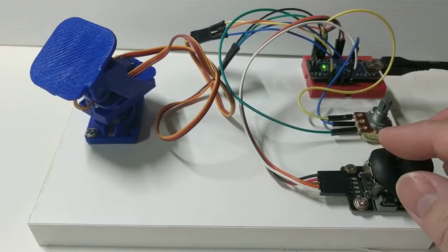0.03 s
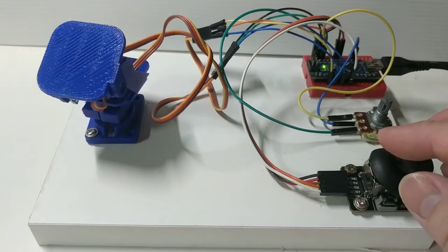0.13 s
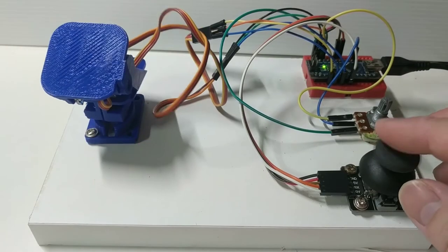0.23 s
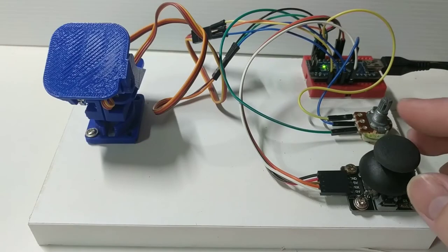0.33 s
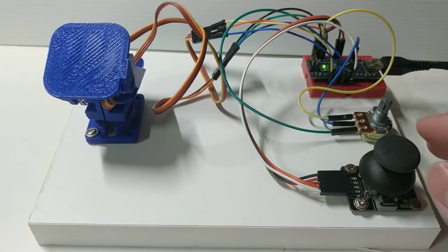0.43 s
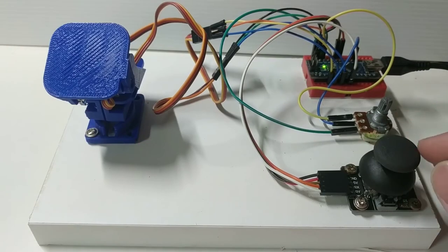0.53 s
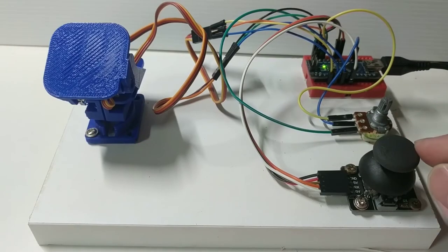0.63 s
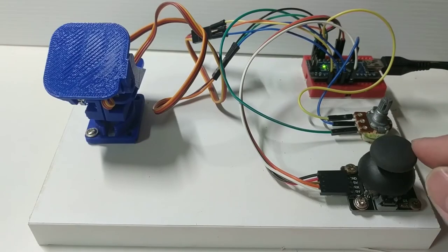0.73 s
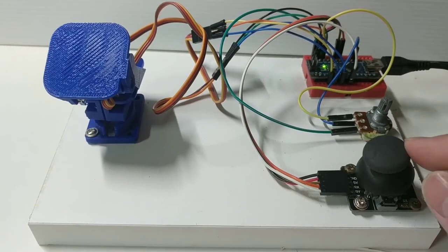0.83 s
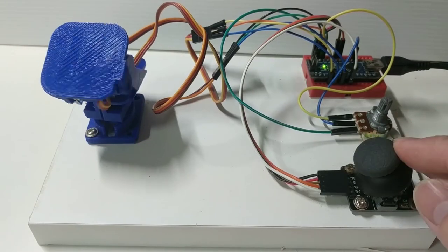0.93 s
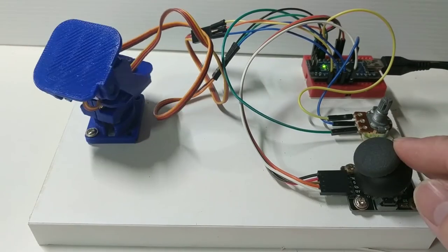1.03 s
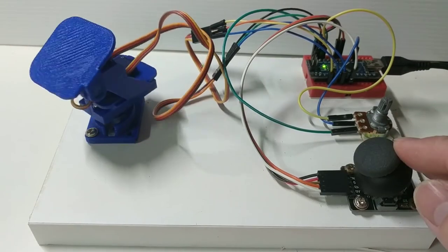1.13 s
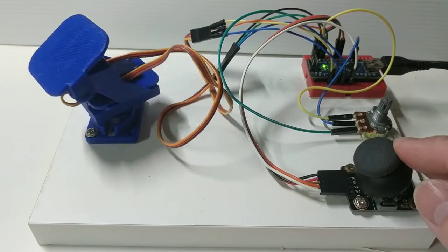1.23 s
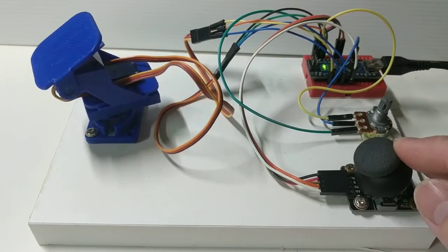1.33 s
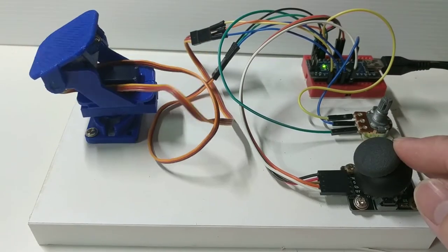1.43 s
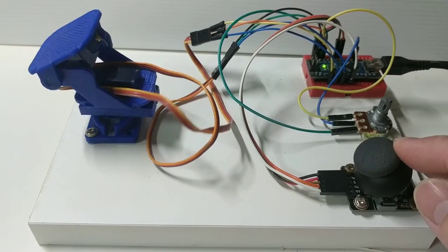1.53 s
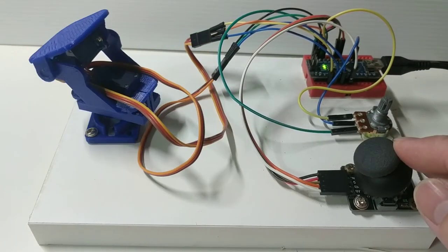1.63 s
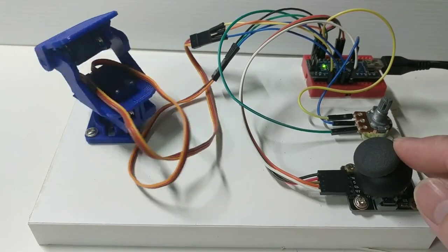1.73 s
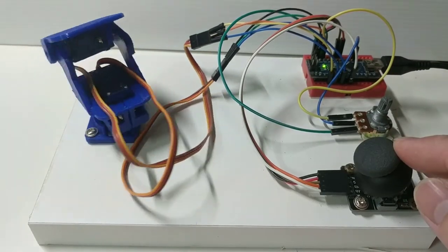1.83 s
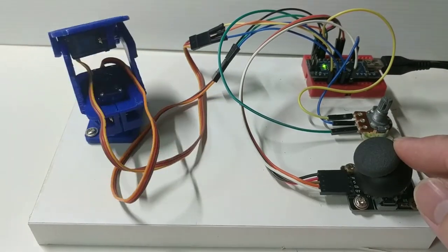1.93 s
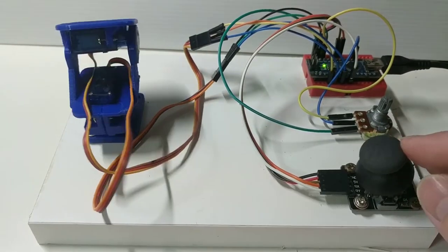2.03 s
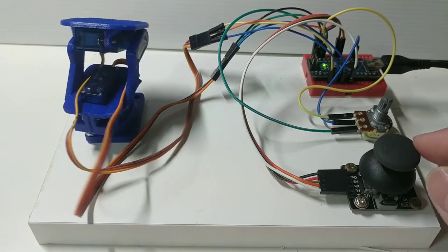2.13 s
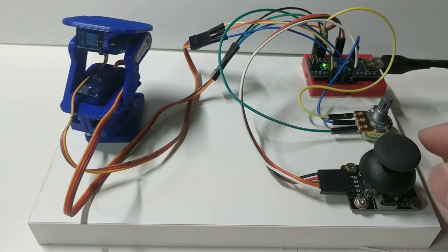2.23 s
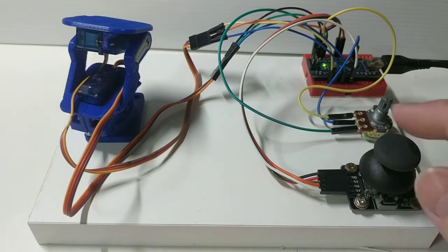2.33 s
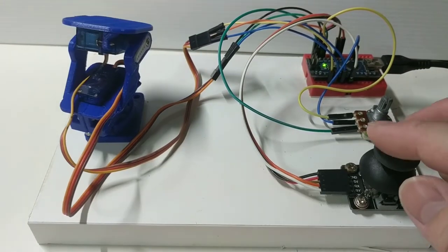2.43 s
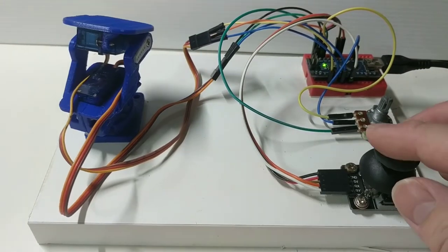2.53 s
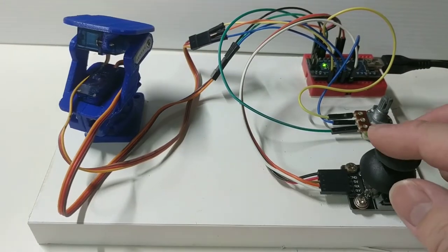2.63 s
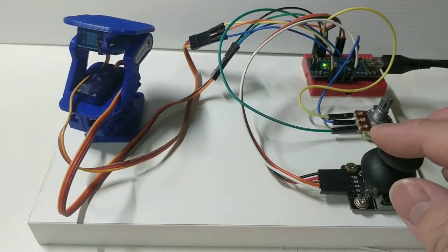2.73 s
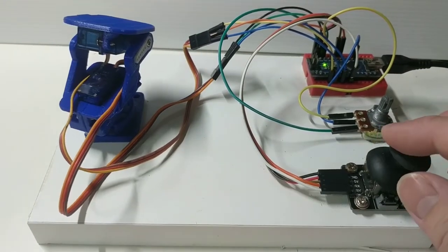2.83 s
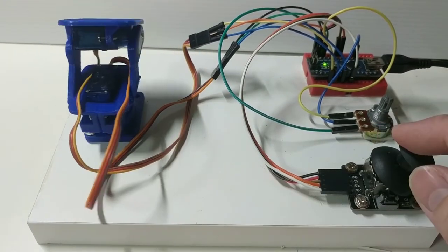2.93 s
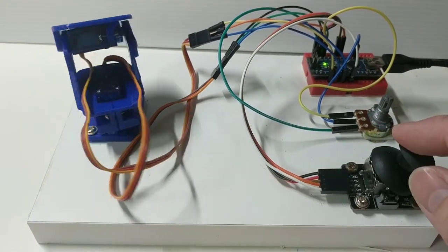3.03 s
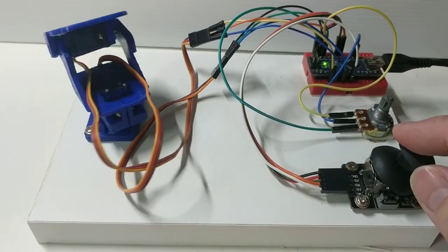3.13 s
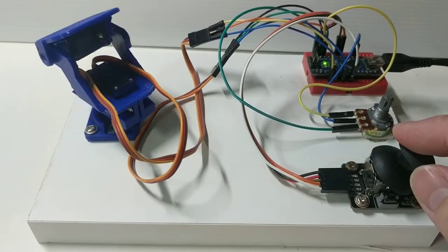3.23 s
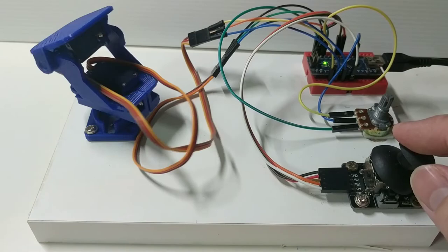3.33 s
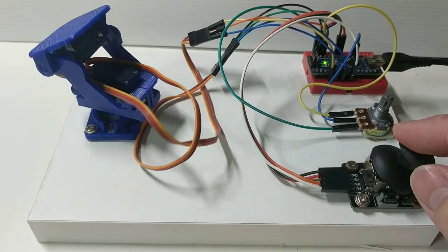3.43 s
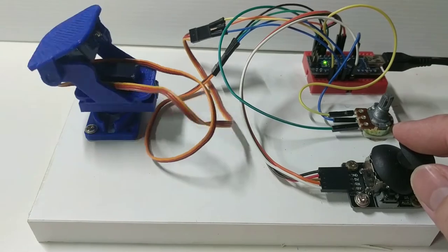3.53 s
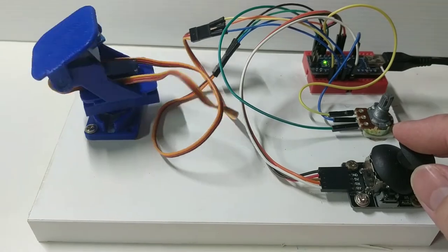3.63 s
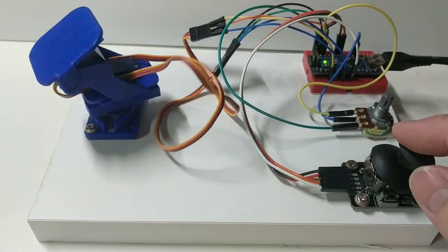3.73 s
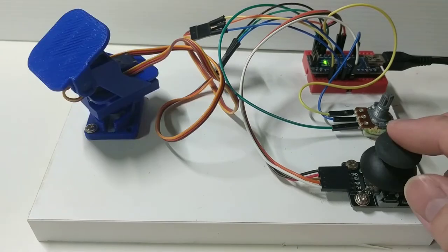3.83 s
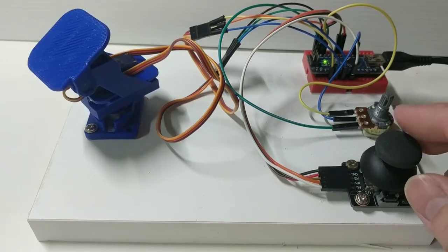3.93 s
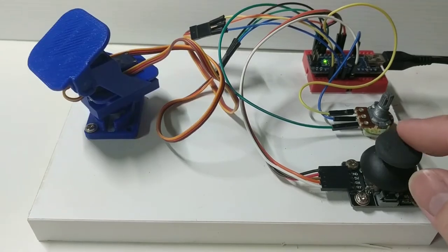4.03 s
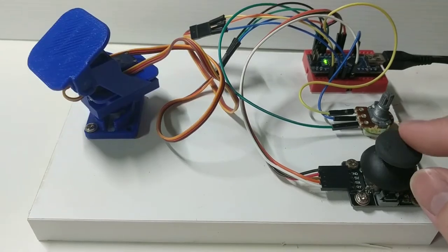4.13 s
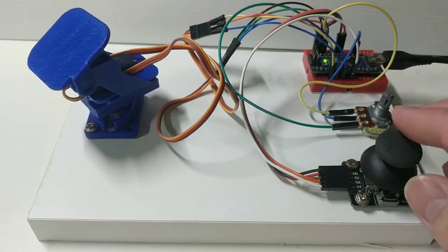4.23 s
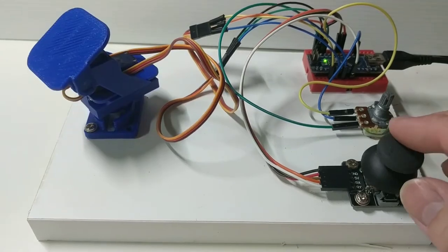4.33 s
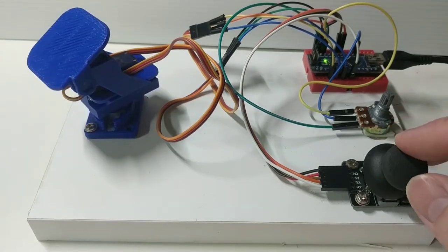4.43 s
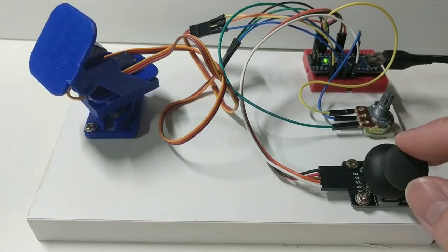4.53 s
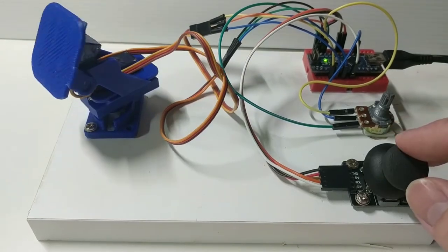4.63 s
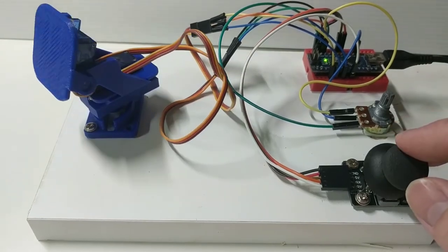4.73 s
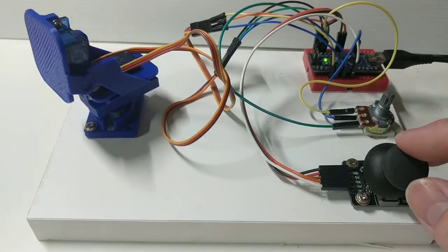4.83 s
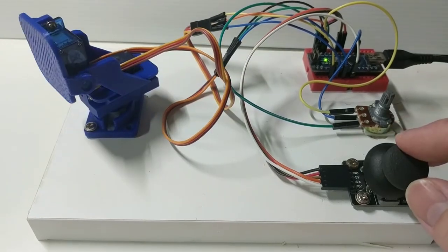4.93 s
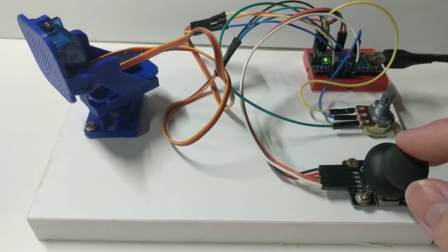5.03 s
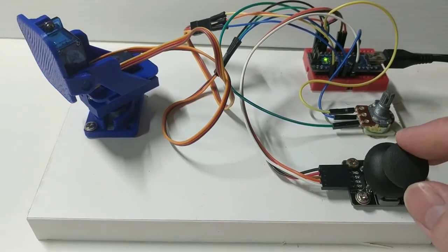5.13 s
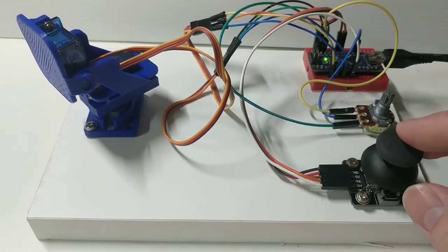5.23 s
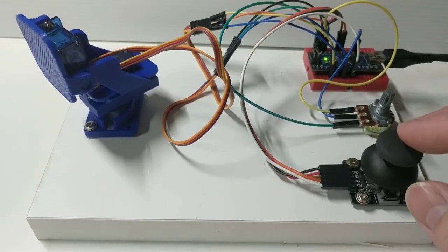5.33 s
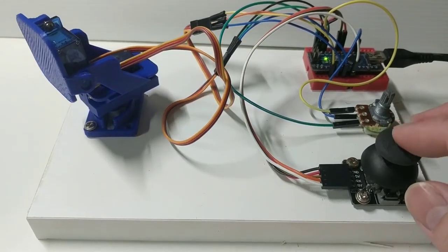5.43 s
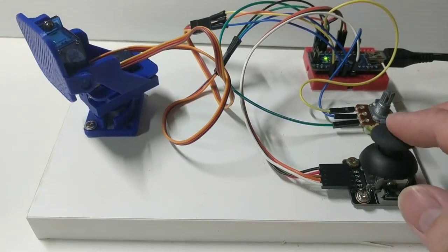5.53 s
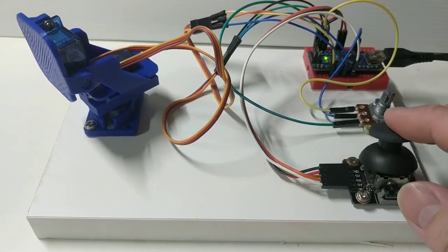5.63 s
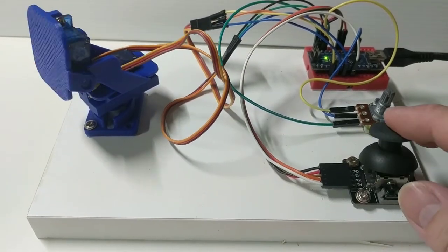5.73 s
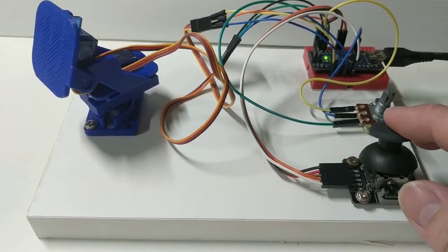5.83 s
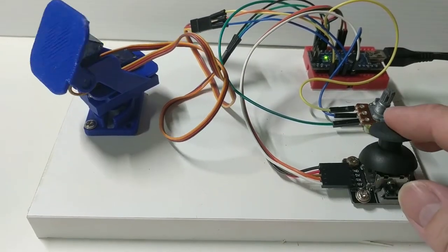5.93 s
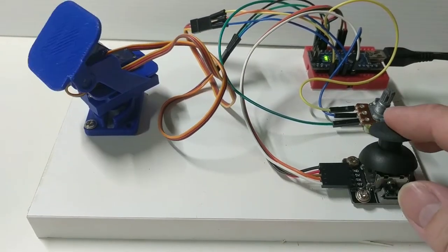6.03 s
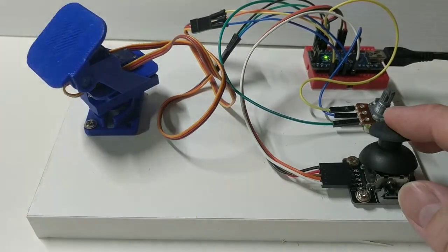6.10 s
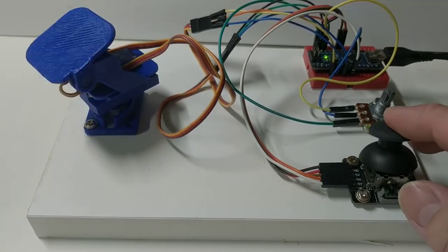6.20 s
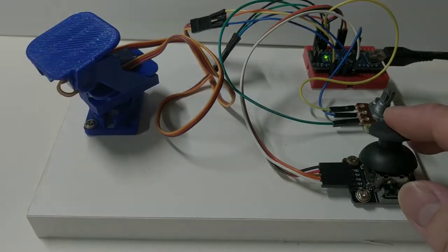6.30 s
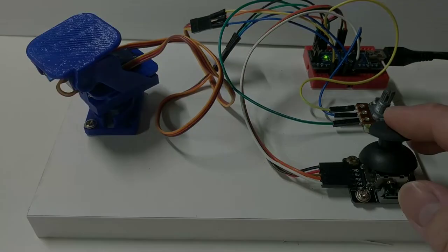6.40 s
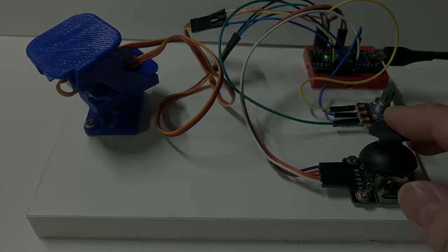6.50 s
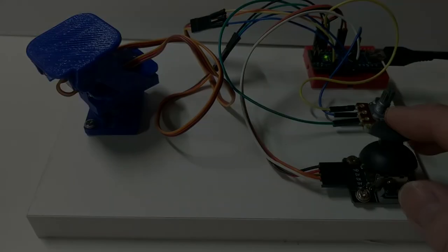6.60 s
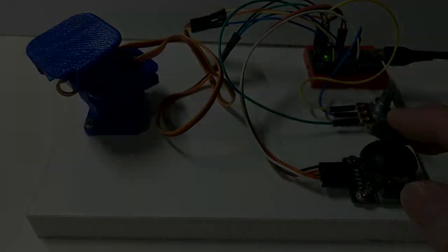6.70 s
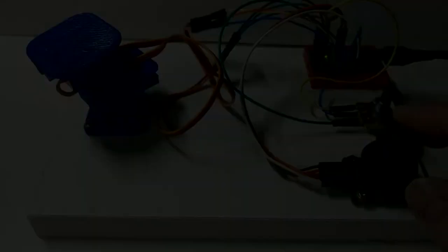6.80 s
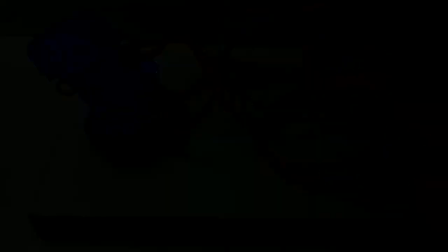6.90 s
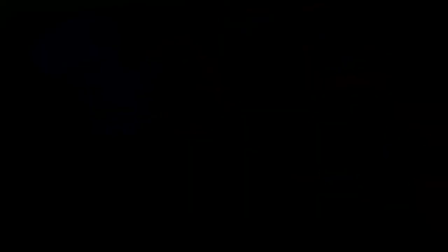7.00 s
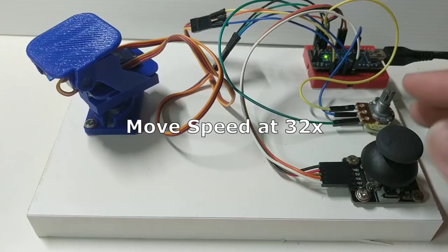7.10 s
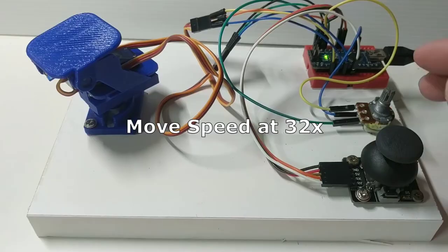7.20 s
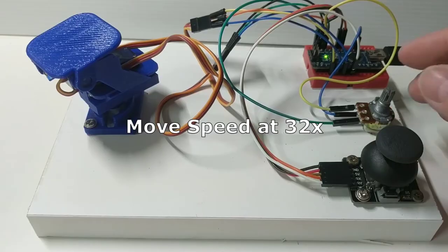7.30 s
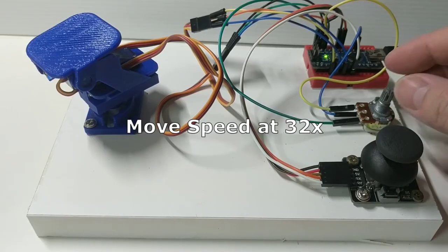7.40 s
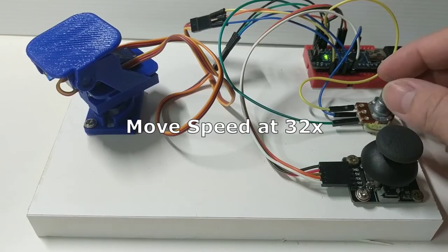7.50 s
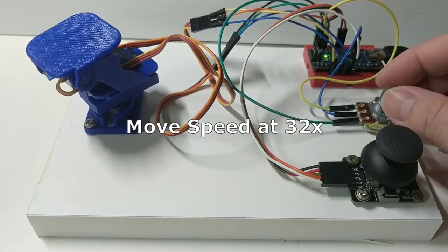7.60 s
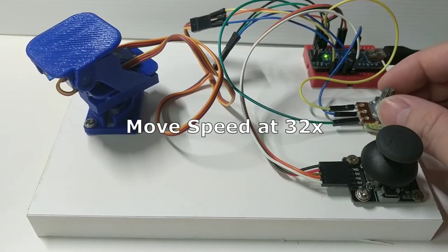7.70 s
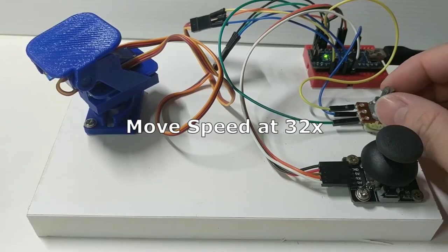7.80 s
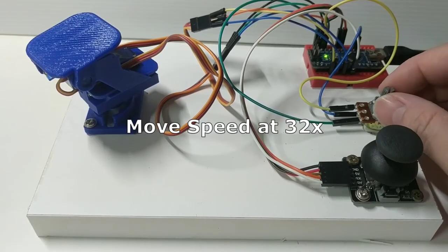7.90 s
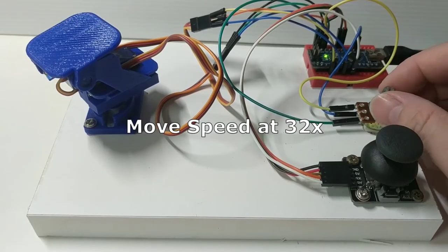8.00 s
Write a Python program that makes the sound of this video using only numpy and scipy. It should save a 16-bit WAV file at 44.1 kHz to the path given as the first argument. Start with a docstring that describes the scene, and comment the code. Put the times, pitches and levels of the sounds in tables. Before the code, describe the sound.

Two tiny hobby motors move a plastic mount, heard close up and fairly dry in a small room. First come gritty, rattling bursts of loose gears, ending once in a brief scrape against a stop. Denser, more even buzzes follow from the other motor, brighter the second time. Small stick clicks punctuate the moves, a sharp crack falls near the end, and faint rapid ticking, hum and hiss continue.

```python
"""On a desk in a small room, two micro servos swing a plastic pan-and-tilt gimbal in short, quick steps.
Each step is a rasp of gear teeth, made from random taps and sliding noise rung through the case.
The loose pan gears also knock and rattle, and the pan servo scrapes into its end stop.
Motor pulses tick and the frame hums at multiples of about 50 Hz, over room rumble and hiss.
The joystick clicks and snaps back to centre: short cracks that ring its case, board and desk."""
import sys
import numpy as np
from scipy import signal
from scipy.fft import rfft, irfft, next_fast_len
from scipy.io import wavfile

SR = 44100
rng = np.random.default_rng(int(sys.argv[2]) if len(sys.argv) > 2 else 0)


def wav_out(sig):
    """Save sig, one row per channel (or a flat mono array), as 16-bit PCM at SR to the path in sys.argv[1]."""
    wavfile.write(sys.argv[1], SR, np.round(np.clip(np.atleast_2d(sig).T, -1, 1) * 32767).astype(np.int16))


N = 355269

# Table levels are relative starting levels: the functions below trim them as they mix.

# Room noise: pitch_hz, level_db (per Hz)
AIR_SPECTRUM = [(15, -58), (25, -20.5), (113, -5.5), (189, 1.5), (299, -5.5), (382, -12.5), (449, -14),
                (729, -16), (981, -23), (1250, -23.5), (3050, -29), (4100, -24), (6140, -34.5),
                (11700, -38), (15800, -48)]
# Resonances in the room noise: pitch_hz, width_hz, lift_db
AIR_RESONANCES = [(54, 25.7, 15), (95.5, 8.4, 5), (119.9, 9, 11), (175.3, 9.8, 3), (1273, 96, 7.5),
                  (4260, 290, 5.5), (12400, 390, -1)]
# Hum of the loaded frame: multiple (of the control rate), unloaded_db, at_pan_stop_db, parked_db
HUM_TONES = [(4, -55, -64, -47.5), (5, -53.5, -52, -50.5), (7, -59.5, -55.5, -48), (8, -61, -73, -50),
             (10, -58.5, -45.5, -58), (11, -64.5, -55.5, -68), (12, -67, -54, -72), (13, -72, -71, -81),
             (14, -61.5, -64, -64), (16, -62.5, -63, -73)]
# Ticks of the holding pulses over time: start_s, level_db
HOLD_LEVELS = [(0, -47.5), (.45, -52), (1, -54), (2.35, -50), (2.9, -48.5), (4, -52), (5.2, -55),
               (5.6, -62), (6.4, -57.5), (7.1, -52)]
# Colour of one tick: pitch_hz, level_db
TICK_COLOUR = [(300, -12.5), (700, 7), (1500, 2), (2000, -2), (3000, -5), (4100, 4.5), (5300, 2),
               (7200, -7), (8400, -1.5), (9500, -5.5), (11300, -5.5), (12500, -16), (16000, -15)]
# Rings of the frame under holding pulses: pitch_hz, width_hz, straining_lift_db, parked_lift_db
HOLD_RESONANCES = [(794, 140, 14.5, -2), (1940, 450, 15, 5.5), (2350, 420, -4, 11.5), (3900, 190, 2, 6),
                   (5260, 670, 8, 0.5), (8200, 520, 0, 8), (9250, 640, -5, -3), (11500, 1100, 4, 7),
                   (13800, 900, 11, 2)]
# Stronger pulses as the tilt servo hunts for its position: start_s, length_s, first_level_db
TWITCH_RUNS = [(5.087, .04, -35), (5.206, .06, -31.5), (6.4224, .06, -30), (6.519, .04, -33.5)]
# Pan servo steps: start_s, length_s, level_db, turned (how far the gimbal is turned, 0 to 1)
PAN_MOVES = [(0.015, 0.13, -25.5, 0.22), (0.158, 0.13, -27.5, 0.08), (0.317, 0.088, -32.5, 0),
             (1.034, 0.14, -31, 0.03), (1.193, 0.13, -27.5, 0.01), (1.335, .15, -25.5, 0.46),
             (1.472, 0.15, -26, 0.68), (1.635, 0.14, -23.5, 0.82), (1.763, 0.14, -26, 0.52),
             (1.907, 0.15, -29, .1), (2.075, .16, -27, 0.07), (2.209, .16, -23.5, 0.25),
             (2.97, .145, -28.5, .05), (3.092, 0.12, -24, 0), (3.229, 0.14, -27, 0),
             (3.404, 0.098, -24, .75), (3.548, 0.13, -22.5, 0.91), (3.687, 0.12, -21, .85),
             (3.829, .132, -23, .55)]
# Stroke shared by all pan steps: kick (share of top speed), climb (share of the length)
PAN_KICK_CLIMB = (.42, .27)
# Pan gearbox colour: pitch_hz, level_db (per Hz)
PAN_COLOUR = [(150, -20), (400, -18), (750, -3), (1500, -16.5), (2100, -14), (2500, -18.5), (3100, -6),
              (3900, -12), (4800, -6), (7200, -1.5), (9000, 0.5), (10500, -7), (13500, -14), (16000, -19)]
# Pan case resonances: pitch_hz, width_hz, straight_lift_db, turned_lift_db
PAN_RESONANCES = [(2146, 190, 9, 9.5), (3524, 130, 16.5, 6), (4710, 360, 5, 21), (5320, 150, 6.5, 2),
                  (6110, 880, 1.5, 14.5), (7930, 420, -6.5, 14.5), (8130, 510, 5.5, 13),
                  (8170, 240, 8, 3.5), (9120, 190, 9, 8.5), (13400, 1600, -2.5, 14)]
# Hardest backlash knocks in the pan gears: start_s, level_db (peak)
HARD_KNOCKS = [(1.0574, -9), (1.2274, -9.5), (1.401, -7), (1.535, -11.5), (1.6936, -15), (1.724, -13),
               (1.804, -11.5), (1.832, -7), (3.112, -6), (3.2704, -10), (3.577, -8.5), (3.5885, -6.5),
               (3.596, -4.5), (3.6313, -9.5)]
# Gear rumble through the desk: pitch_hz, level_db
DESK_RUMBLE = [(150, -24.5), (350, 13.5), (550, 10.5), (780, 16.5), (1100, -5.5), (2000, -40.5)]
# Joystick strikes: start_s, level_db (peak of the crack), board_ring_db, low_thump_db
STICK_STRIKES = [(0.3597, -7, 2.5, -11), (1.049, -22.5, 0.5, -3), (3.0095, -17, -2.5, 0),
                 (3.9425, -13.5, -2, -1), (4.5458, -20.5, -4.5, 8), (6.8885, -7, -10, 1.5),
                 (6.897, -5.5, -5, 3)]
# Joystick crack: pitch_hz, level_db
CRACK_COLOUR = [(100, -4), (180, -9.5), (330, 9.5), (450, -17), (680, -4), (1200, -8), (1900, -1.5),
                (2750, 1), (3600, -6), (5000, -3.5), (7000, -3), (9000, -19.5), (16000, -19)]
# Rings of the joystick case: pitch_hz, level_db, t60_s (time to fall 60 dB)
STICK_CASE_RINGS = [(1120, -25, 0.053), (1302, -22.5, 0.066), (1685, -21, 0.043), (1955, -27.5, 0.064),
                    (2340, -27, .033), (2760, -29, .023), (4460, -18, 0.03)]
# Rings of the board under the joystick: pitch_hz, level_db, t60_s
BOARD_RINGS = [(565, -28, .05), (674, -8.5, 0.023), (872, -19.5, 0.085), (1045, -25.5, 0.061)]
# Rings of the desk: pitch_hz, level_db, t60_s
DESK_RINGS = [(94, -25, 0.12), (180, -23, 0.095), (280, -29, 0.05), (386, -38, 0.044)]
# Frame scraping into its end stop: start_s, rise_s (to full pressure), length_s, level_db
END_SCRAPE = (2.255, .017, 0, -29.5)
# Colour of that scrape: pitch_hz, level_db
SCRAPE_COLOUR = [(2000, -33), (2900, -1), (3400, -3), (3900, 0), (4500, -4), (6000, -17)]
# Tilt servo steps: start_s, length_s, level_db
TILT_MOVES = [(4.569, 0.14, -25.5), (4.708, 0.14, -26), (4.866, .132, -25), (5.002, 0.093, -31),
              (5.748, .13, -27), (5.885, 0.14, -27), (6.024, .138, -27), (6.184, 0.14, -25.5),
              (6.321, .122, -32)]
# Stroke shared by all tilt steps: kick (share of top speed), climb (share of the length)
TILT_KICK_CLIMB = (.55, .3)
# Tilt gearbox colour going down: pitch_hz, level_db (per Hz)
TILT_DOWN_COLOUR = [(710, -23), (1200, -22), (1410, -21.5), (2240, -13), (2470, -20), (2840, -10.5),
                    (3070, -15), (3970, -5.5), (5920, -5), (6320, -13), (7110, -5), (8640, -10.5),
                    (9520, -3.5), (14000, -18), (15800, -23)]
# Tilt gearbox colour going up: pitch_hz, level_db (per Hz)
TILT_UP_COLOUR = [(710, -32), (1200, -5.5), (1410, -15), (1540, -6.5), (1680, -9.5), (2220, -6.5),
                  (3070, -6.5), (3640, 1), (4770, 2), (5730, -2), (9020, 3.5), (11100, -4), (11900, -9),
                  (13200, -7), (15800, -19)]
# Tilt case resonances: pitch_hz, width_hz, down_lift_db, up_lift_db
TILT_RESONANCES = [(2270, 130, 5, 6), (4010, 200, 8.5, 5), (4820, 360, 0, 2.5), (4930, 86, 4, 6),
                   (5660, 470, 1, 4.5), (7300, 280, 0, 4.5), (9900, 450, 2, -2), (10700, 400, -6, 0),
                   (11440, 500, 7.5, 3.5), (12000, 350, -1, -5), (13800, 600, 5, -1)]
# How long the room rings: pitch_hz, t60_s
ROOM_DECAY = [(200, 0.3), (1000, 0.32), (4000, 0.25), (9000, 0.15), (16000, 0.031)]

# Weight of the low housing band and of the top fizz: (housing dB, fizz dB)
PAN_OUT_POSE, PAN_BACK_POSE, TURNED_POSE = (2.7, 0.84), (-0.58, 0.7), (4.5, -1.6)
TILT_DOWN_POSE, TILT_UP_POSE = (0.27, -1), (1, 2.3)

CONTROL_HZ = 50.08  # motor pulses per second
PAN_BACK_S, TILT_UP_S = 2.6, 5.4  # when the pan turns back, and when the tilt turns upward
END_STOP_S, BRAKE_S = 2.292, 0.011  # the pan servo runs out of travel and stalls
TURNED_CLIMB = 0.14  # the turned gimbal adds this share of the step to the climb
# As the motor starts, the gears cross their backlash and meet
TAKE_UP_S, TAKE_UP_DB, TURNED_TAKE_UP_DB = 0.007, 4, 1  # delay; peak above the step; more when turned
# Lighter knocks fall by chance, more often at speed and with the gimbal turned
RATTLE_PER_S, TURNED_RATTLE_PER_S = 20, 33  # rate at top speed, and what turning adds
RATTLE_DB, RATTLE_SPREAD_DB = 9.5, 3  # peak above the step's level, and its scatter
REBOUND_S = 0.0047  # delay of each joystick rebound
REBOUND_DB, REBOUND_BODY_DB = -5, -3.5  # change per rebound, for the crack and for the body's ring
BRIGHT_PER_DB, BRIGHT_FROM_DB = 1.3, -8  # cracks below this level lose so many dB of treble per dB
TWITCH_FADE_DB_PER_S = 65
AIR_DB = -39
EDGE_HZ = 15950  # top of the recorder's band

TIME, HZ = np.arange(N) / SR, np.fft.rfftfreq(4096, 1 / SR)


def amp(db):
    """Turns decibels into gain."""
    return 10 ** (np.asarray(db) / 20)


def unit(x):
    """Scales a sound to an average (rms) level of 1."""
    return x / np.sqrt(np.mean(x ** 2) + 1e-20)


def curve(points, hz=HZ):
    """Reads a table of points as a smooth line over log frequency."""
    f, value = np.transpose(points)
    return np.interp(np.log(hz + 1), np.log(f + 1), value)


def humps(modes, hz=HZ):
    """Adds up the dB lift of a set of resonances."""
    return sum(db / (1 + (2 * (hz - f) / width) ** 2) for f, width, db in modes)


def colour(x, db):
    """Rings x through a filter of unit energy with the given dB shape, with no sound ahead of time."""
    log_gain = np.log(amp(np.maximum(db, db.max() - 80)))
    mirrored = np.r_[log_gain, log_gain[-2:0:-1]]
    # minimum phase: the ring starts as early as its spectrum allows
    ring = np.fft.ifft(np.exp(signal.hilbert(mirrored).conj())).real[:1500]
    return signal.fftconvolve(x, ring / np.linalg.norm(ring))


def add(mix, s, sound):
    """Mixes a sound in at s seconds."""
    part = mix[max(round(s * SR), 0):][:len(sound)]
    part += sound[:len(part)]


def wander(count, hz):
    """Makes a smooth random line of rms 1 that moves mostly slower than hz."""
    f = np.fft.rfftfreq(count, 1 / SR)
    spectrum = rfft(rng.standard_normal(count)) * (f > 0) / (1 + (f / hz) ** 4)
    return unit(irfft(spectrum, count))


def contact(rise, decay):
    """Two parts meet: a brief random chatter with an envelope that peaks at 1."""
    t = TIME[:1200]
    shape = (1 - np.exp(-t / rise)) * np.exp(-t / decay)
    return rng.choice([-1., 1.], len(t)) * shape / shape.max()


def parked():
    """Goes from 0 to 1 as the gimbal settles after its last move."""
    return np.interp(TIME, [6.45, 6.65], [0, 1])


def air():
    """Steady room rumble and microphone hiss: random noise shaped by a spectrum."""
    count = next_fast_len(N)
    hz = np.fft.rfftfreq(count, 1 / SR)
    shape_db = curve(AIR_SPECTRUM, hz) + humps(AIR_RESONANCES, hz)
    spectrum = rfft(rng.standard_normal(count)) * amp(shape_db)
    return amp(AIR_DB) * unit(irfft(spectrum, count)[:N])


def hum():
    """The frame hums on multiples of the control rate; their balance depends on how it is loaded."""
    at_stop = np.interp(TIME, [2.27, 2.31, 2.95, 3], [0, 1, 1, 0])
    at_rest = parked()
    waver = wander(next_fast_len(N), 5.4)[:N]
    out = np.zeros(N)
    for multiple, free_db, stop_db, parked_db in HUM_TONES:
        db = free_db + at_stop * (stop_db - free_db) + at_rest * (parked_db - free_db)
        tone = np.sin(2 * np.pi * (multiple * CONTROL_HZ * TIME + rng.random()))
        out += amp(db) * np.sqrt(2) * tone
    return out * amp(-1.5 + 1.56 * waver)


def holding():
    """Every control frame nudges each motor once, one just after the other; some nudges are stronger."""
    drive = np.zeros(N)
    # the same teeth meet each time, so the nudges are much alike
    nudge = contact(rise=0.0003, decay=0.001)
    for s in np.arange(0.5, N / SR * CONTROL_HZ) / CONTROL_HZ:
        first, second = rng.standard_normal(2)  # random strengths
        varied = nudge + 0.9 * contact(rise=0.0003, decay=0.0012)
        add(drive, s, amp(1.5 * first) * varied)
        add(drive, s + 0.0035, amp(3 * second - 7) * contact(rise=0.0004, decay=0.002))
    drive = unit(drive) * amp(np.interp(TIME, *np.transpose(HOLD_LEVELS)))

    for s, length, db in TWITCH_RUNS:
        for after in np.arange(round(length * CONTROL_HZ)) / CONTROL_HZ:
            twitch = contact(rise=0.0005, decay=0.0014)
            add(drive, s + after, amp(db - 3.5 - TWITCH_FADE_DB_PER_S * after) * twitch)

    straining = np.interp(TIME, [3.95, 4.03, 4.41, 4.43], [0, 1, 1, 0])
    at_rest = parked()
    plain = curve(TICK_COLOUR)
    strained = plain + humps([(hz, width, db) for hz, width, db, _ in HOLD_RESONANCES])
    settled = plain + humps([(hz, width, db) for hz, width, _, db in HOLD_RESONANCES])
    out = colour(drive * (1 - straining - at_rest), plain)
    out += amp(3.5) * colour(drive * straining, strained)
    out += colour(drive * at_rest, settled)
    return out[:N]


def stroke(s, length, kick, climb):
    """Motor speed in one step: a kick, a climb and a coast to rest, cut short if it meets the end stop."""
    t = TIME[:8000]
    speed = np.interp(t, [0, 0.005, climb * length, length], [0, kick, 1, 0])
    if s < END_STOP_S:
        speed = speed * np.clip(1 - (s + t - END_STOP_S) / BRAKE_S, 0, 1)
    return speed


def step(speed, db, teeth_hz, uneven_db, rattle_db, rotor_hz, slide):
    """Gear teeth tap and slide, louder with speed; the two rates in Hz are those at top speed."""
    t = TIME[:len(speed)]
    pace = np.sqrt(abs(speed))
    # a tap falls each time the running count of teeth passes a whole number
    mesh = np.diff(np.floor(np.cumsum(teeth_hz * pace) / SR), prepend=0) > 0
    strength = amp(uneven_db * np.clip(rng.standard_normal(len(t)), -2, 2))
    taps = mesh * strength * rng.choice([-1, 1], len(t))
    rasp = unit(taps) + slide * rng.standard_normal(len(t))
    # an off-centre gear bites once a turn
    turns = np.cumsum(rotor_hz * pace * (1 + 0.31 * wander(len(t), 103))) / SR + rng.random()
    load = np.cos(2 * np.pi * turns) + 0.5 * np.clip(wander(len(t), 136), -2, 2)
    return amp(db) * unit(rasp * amp(rattle_db * load) * speed) * np.sqrt(np.mean(speed ** 2))


def pose(housing_db, fizz_db):
    """The gimbal's position shifts the weight of the low housing band and of the top fizz."""
    return curve([(1500, housing_db / 2), (2600, housing_db), (3900, housing_db),
                  (4800, 0), (8800, 0), (10500, fizz_db)])


def detuned(box, spread=0.013):
    """Each contact loads the case a little differently and shifts its resonances."""
    return np.interp(HZ, HZ * (1 + spread * rng.uniform(-2.36, 1.53)), box)


def case_ring(teeth, box):
    """Teeth push on the case at changing points, so its colour shifts every few milliseconds."""
    # three versions of the case trade places in loudness
    shares = amp(7 * np.array([wander(len(teeth), 70) for _ in range(3)]))
    shares /= np.linalg.norm(shares, axis=0)
    out = 0
    for share in shares:
        nodes = humps([(rng.uniform(2500, 14000), 500, 3 * rng.standard_normal()) for _ in range(12)])
        out = out + colour(teeth * share, detuned(box) + nodes)
    return out * np.linalg.norm(teeth) / np.linalg.norm(out)


def knock(box):
    """The gears cross their backlash and hit, ringing the case; the peak is 1."""
    tilt = curve([(4000, -8.0), (12000, -0.5)])
    hit = colour(contact(rise=0.0024, decay=0.0012), detuned(box) + tilt)
    return hit / abs(hit).max()


def rattle(speed, per_s, box, count=4):
    """Light knocks fall by chance, unevenly spread over the travel of one step."""
    out = np.zeros(len(speed) + 3000)
    travel = np.cumsum(speed) / SR
    for k, (place, chance) in enumerate(rng.random((count, 2))):
        scatter = np.clip(rng.standard_normal(), -2, 2)
        hit = amp(RATTLE_SPREAD_DB * scatter) * knock(box)
        at = np.searchsorted(travel, travel[-1] * (k + place) / count)
        if chance < per_s * travel[-1] / count:
            add(out, at / SR, speed[at] * hit)
    return out


def pan_servo():
    """Loose gears rasp and knock inside a case whose ring changes as the gimbal turns."""
    out, boxes = np.zeros(N), []
    kick, climb = PAN_KICK_CLIMB
    for s, length, db, turned in PAN_MOVES:
        modes = [(hz, width, straight_db + turned * (turned_db - straight_db))
                 for hz, width, straight_db, turned_db in PAN_RESONANCES]
        weight = pose(*(PAN_OUT_POSE if s < PAN_BACK_S else PAN_BACK_POSE))
        weight = weight + turned * pose(*TURNED_POSE)
        box = curve(PAN_COLOUR) + humps(modes) + weight
        boxes.append(box)
        speed = stroke(s, length, kick, climb + turned * TURNED_CLIMB)
        teeth = step(speed, db, teeth_hz=1400, uneven_db=3, rattle_db=4, rotor_hz=190, slide=0.8)
        add(out, s, amp(-2.0) * case_ring(teeth, box))
        # the base passes some rumble to the desk
        add(out, s, amp(-16.5 - 7.4 * turned) * colour(teeth, curve(DESK_RUMBLE)))
        take_up_db = db + TAKE_UP_DB + turned * TURNED_TAKE_UP_DB
        add(out, s + TAKE_UP_S, amp(take_up_db) * knock(box))
        rattle_per_s = RATTLE_PER_S + turned * TURNED_RATTLE_PER_S
        add(out, s, amp(db + RATTLE_DB) * rattle(speed, rattle_per_s, box))

    starts = [row[0] for row in PAN_MOVES]
    for s, db in HARD_KNOCKS:
        box = boxes[np.searchsorted(starts, s) - 1]  # the case as it is in the latest step
        add(out, s, amp(db - 3.0) * knock(box))
    return out


def ringing(modes):
    """One blow sets off a set of tones that die away."""
    t = TIME[:8000]
    ring = sum(amp(db - 60 * t / t60) * np.sin(2 * np.pi * (hz * t + rng.random()))
               for hz, db, t60 in modes)
    return ring * (1 - np.exp(-t / 0.00035))


def joystick(count=3):
    """The sprung stick strikes its stops and rebounds: a crack rings case and board and thumps the desk."""
    out = np.zeros(N)
    for s, db, board_db, thump_db in STICK_STRIKES:
        for k in range(count):
            at = s + k * REBOUND_S
            crack_db = db + k * REBOUND_DB
            bright_db = BRIGHT_PER_DB * min(crack_db - BRIGHT_FROM_DB, 0)
            shape_db = curve(CRACK_COLOUR) + curve([(2800, 0), (6000, bright_db)])
            crack = colour(contact(rise=0.00015, decay=0.0014), shape_db)
            body = ringing(STICK_CASE_RINGS)
            body += amp(board_db) * ringing(BOARD_RINGS)
            body += amp(thump_db) * ringing(DESK_RINGS)
            add(out, at, amp(crack_db) * crack / abs(crack).max())
            add(out, at, amp(db + k * REBOUND_BODY_DB) * body)
    return out


def end_stop():
    """Plastic scrapes on plastic as the pan servo runs out of travel: noise that follows the pressure."""
    s, rise, length, db = END_SCRAPE
    out, t = np.zeros(N), TIME[:4000]
    # the pressure takes at least 5 ms to let go
    pressure = np.interp(t, [0, rise, max(length, rise + 0.005)], [0, 1, 0])
    scrape = np.sqrt(pressure) * rng.standard_normal(len(t))
    add(out, s, amp(db) * colour(scrape, curve(SCRAPE_COLOUR)))
    return out


def tilt_servo():
    """Tighter gears give an even, dense rasp, coloured differently going down and up, with desk rumble."""
    out = np.zeros(N)
    for s, length, db in TILT_MOVES:
        going_down = s < TILT_UP_S
        modes = [(hz, width, down_db if going_down else up_db)
                 for hz, width, down_db, up_db in TILT_RESONANCES]
        box = curve(TILT_DOWN_COLOUR if going_down else TILT_UP_COLOUR) + humps(modes)
        weight = pose(*(TILT_DOWN_POSE if going_down else TILT_UP_POSE))
        speed = stroke(s, length, *TILT_KICK_CLIMB)
        teeth = step(speed, db, teeth_hz=2396, uneven_db=1.5, rattle_db=2.1, rotor_hz=150.2, slide=0.85)
        add(out, s, case_ring(teeth, box + weight))
        add(out, s, amp(-14.5) * colour(teeth, curve(DESK_RUMBLE)))
    return out


def room(x):
    """A small room: dense random reflections whose treble dies first."""
    hz, t, z = signal.stft(rng.standard_normal(SR // 2), SR, nperseg=256)
    fade = amp(-60 * t / curve(ROOM_DECAY, hz)[:, None])
    tail = signal.istft(z * fade, SR, nperseg=256)[1]
    tail *= np.clip(TIME[:len(tail)] / 0.001 - 0.5, 0, 1)  # a short gap before the reflections
    return signal.fftconvolve(x, tail / np.linalg.norm(tail))[:N]


def scene():
    """Servos and joystick close to the microphone, with a little room, hum and air."""
    servos = pan_servo() + end_stop() + tilt_servo() + holding()
    stick = joystick()
    reflections = room(amp(-15) * servos + amp(-14) * stick)
    return (servos + stick + reflections + hum() + air())[None]


def record(dry):
    """The recorder's band limit: a steep filter takes away the highest treble."""
    low_pass = signal.firwin(511, EDGE_HZ, window=("kaiser", 9), fs=SR)
    return signal.oaconvolve(dry, low_pass[None], "same")


dry = scene()
out = record(dry)
wav_out(out)
```